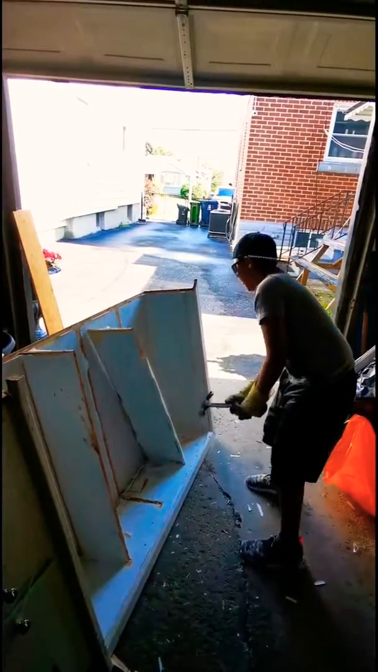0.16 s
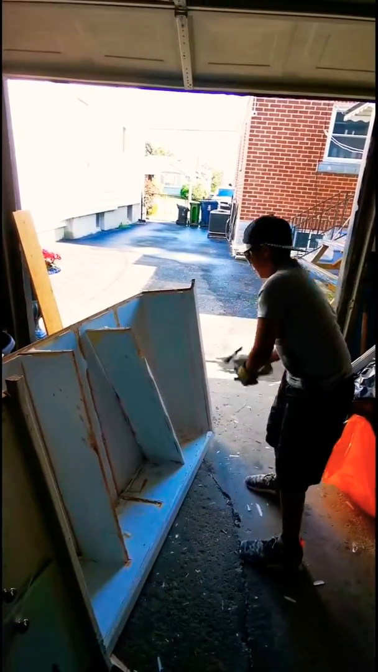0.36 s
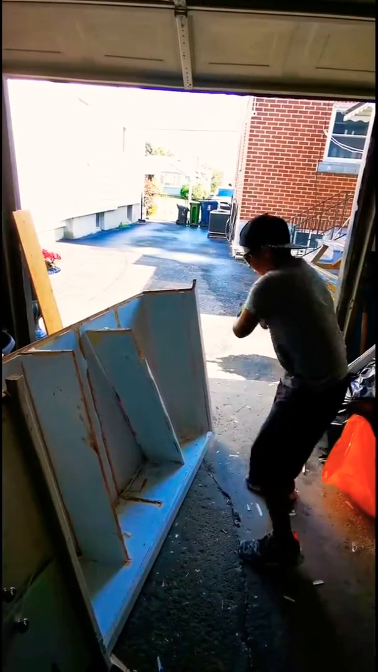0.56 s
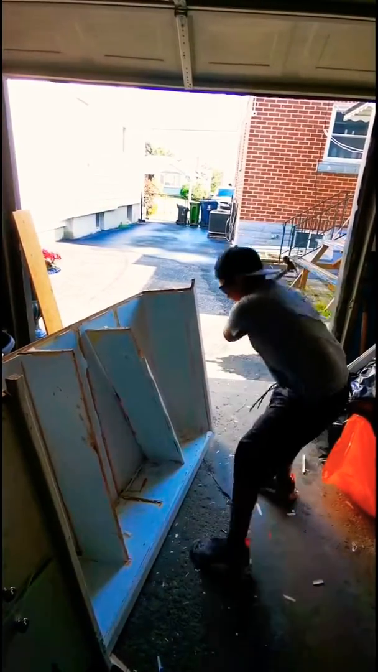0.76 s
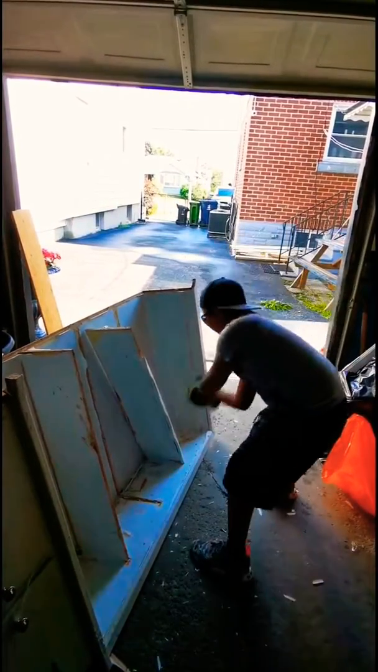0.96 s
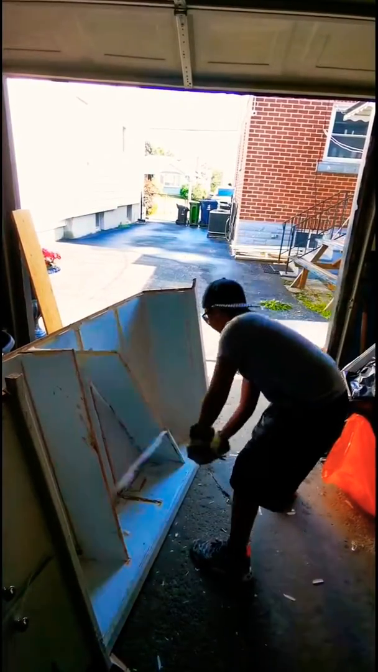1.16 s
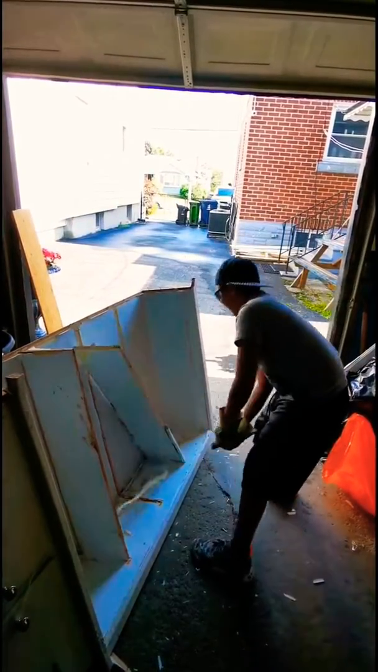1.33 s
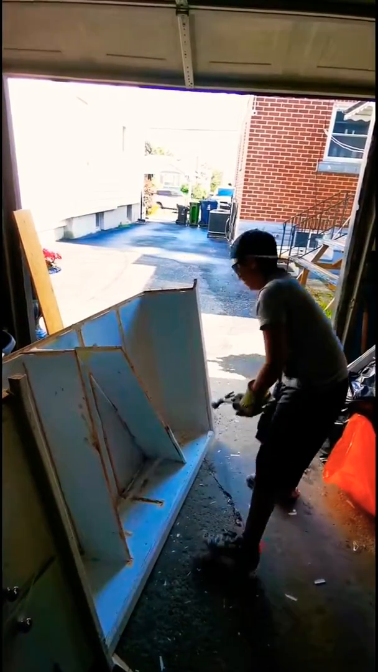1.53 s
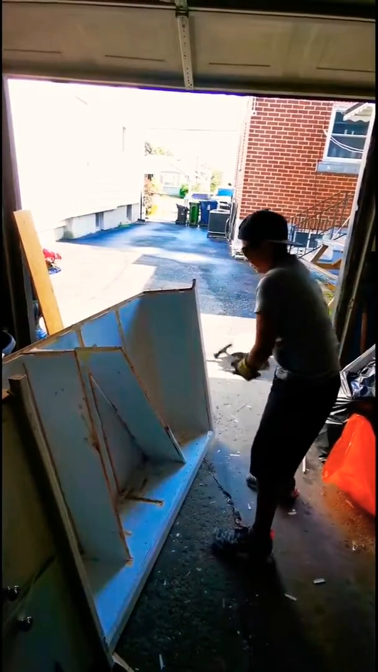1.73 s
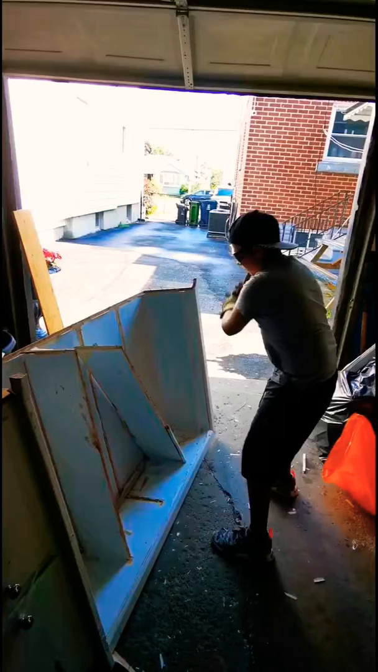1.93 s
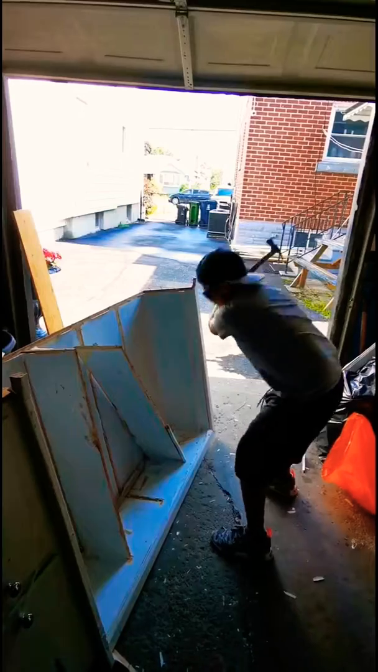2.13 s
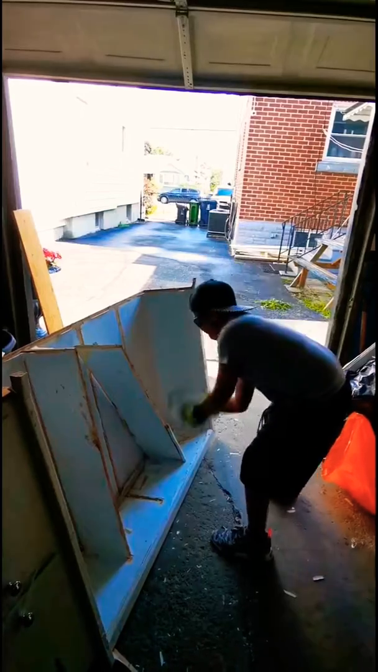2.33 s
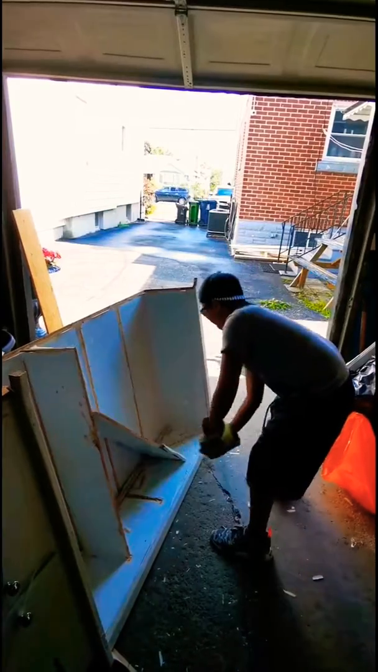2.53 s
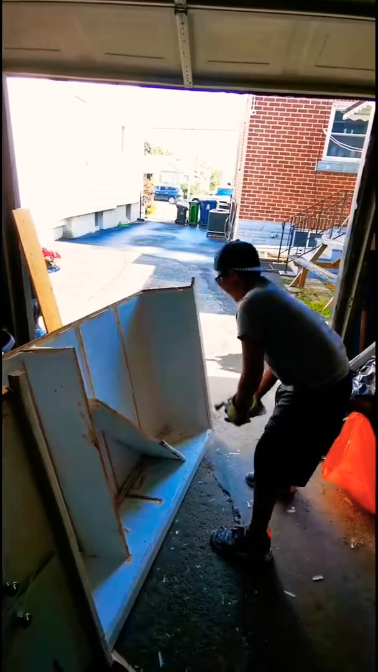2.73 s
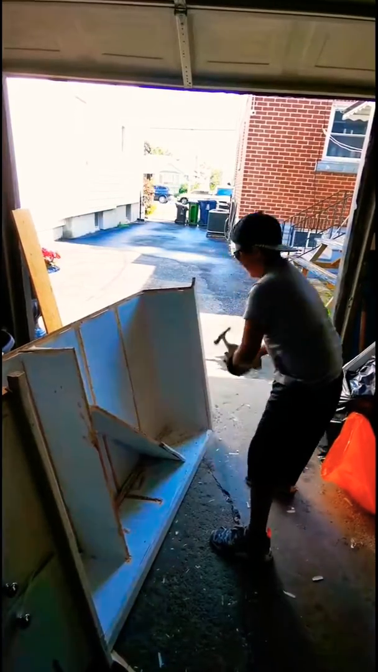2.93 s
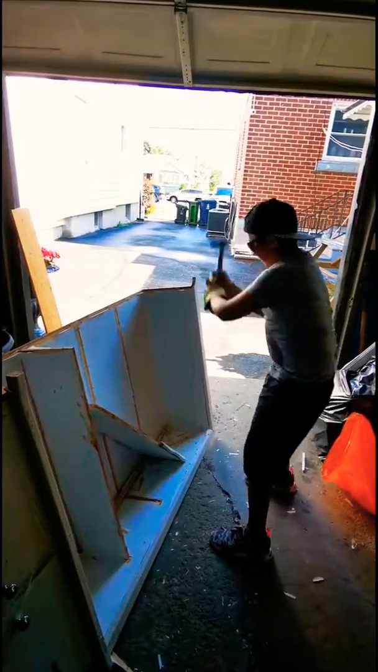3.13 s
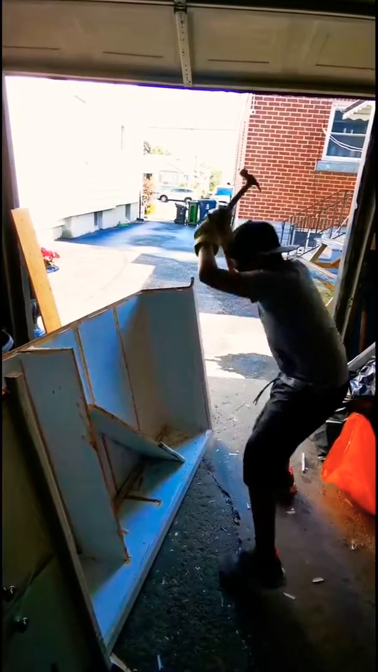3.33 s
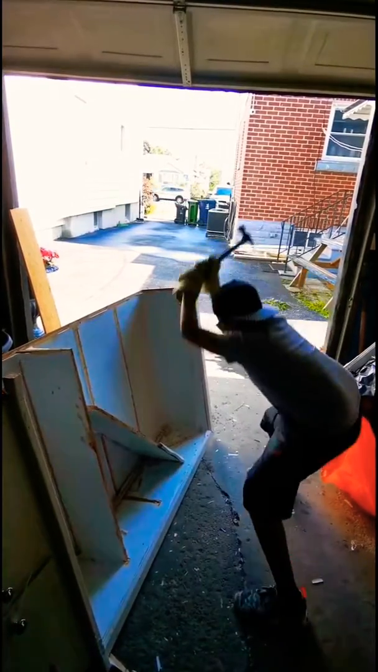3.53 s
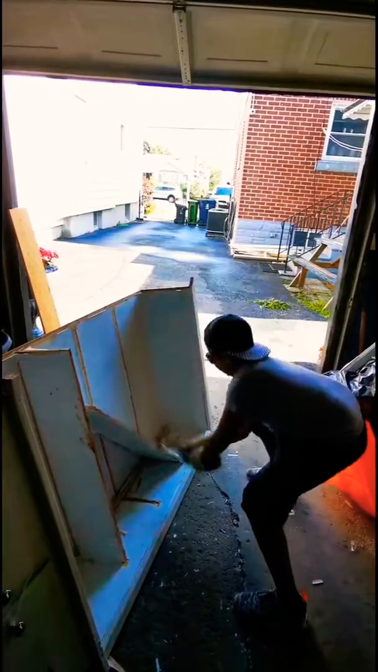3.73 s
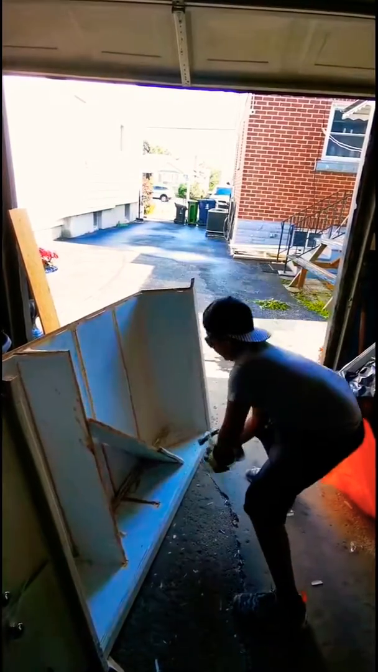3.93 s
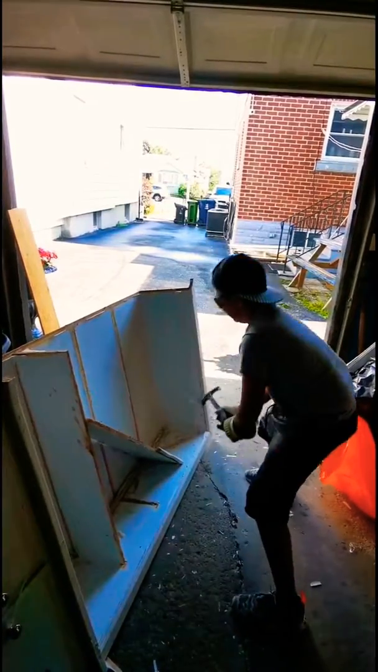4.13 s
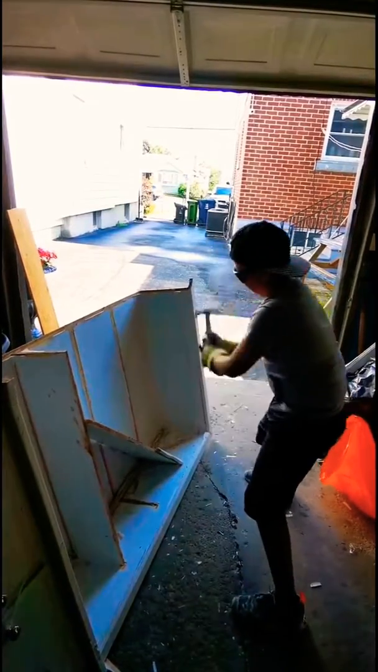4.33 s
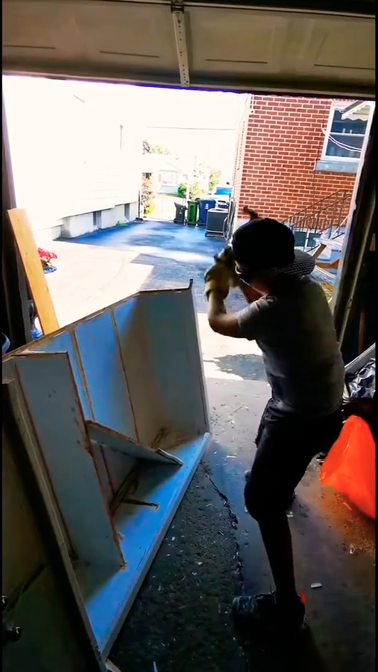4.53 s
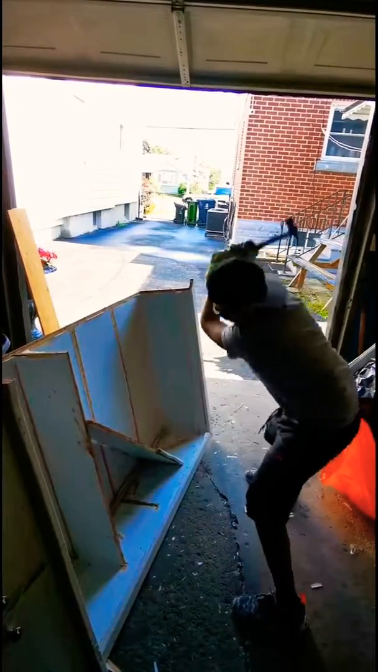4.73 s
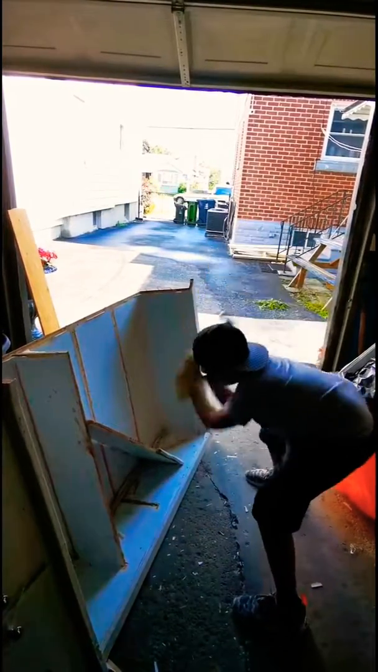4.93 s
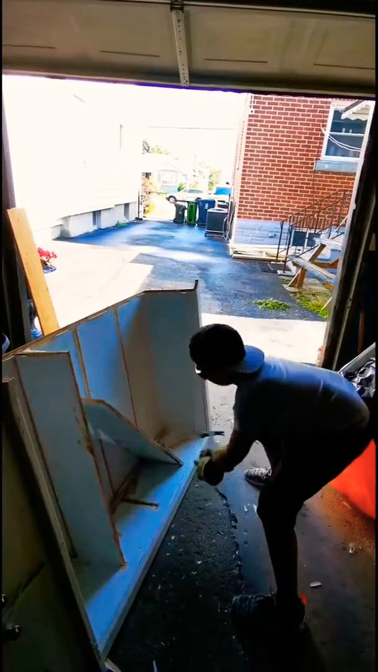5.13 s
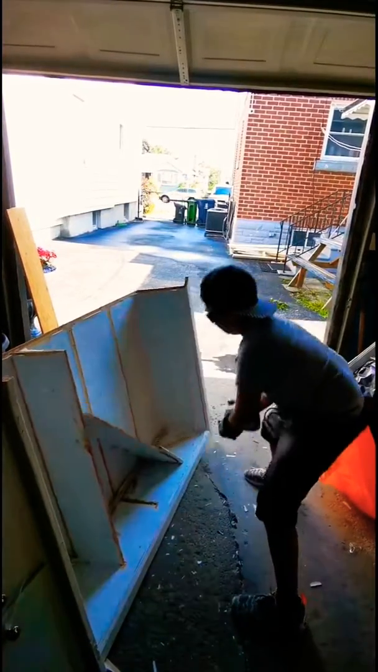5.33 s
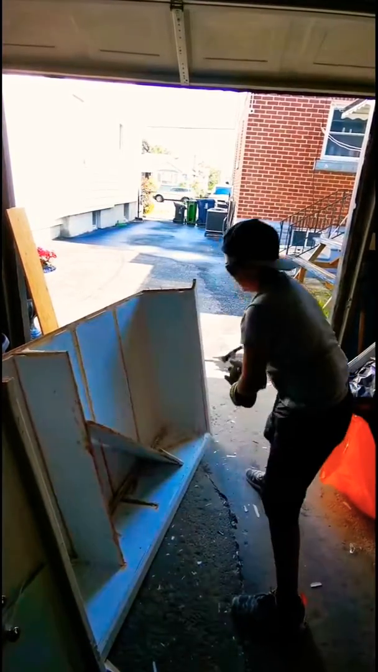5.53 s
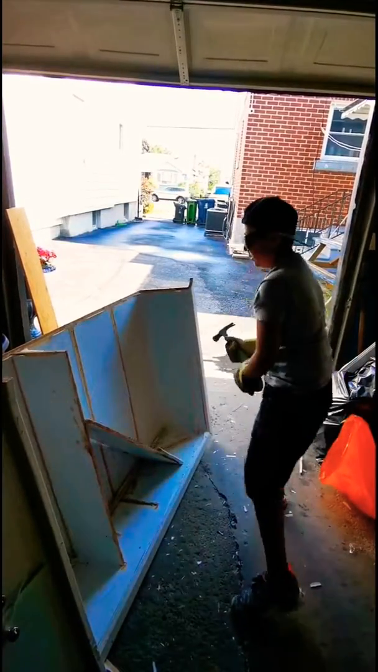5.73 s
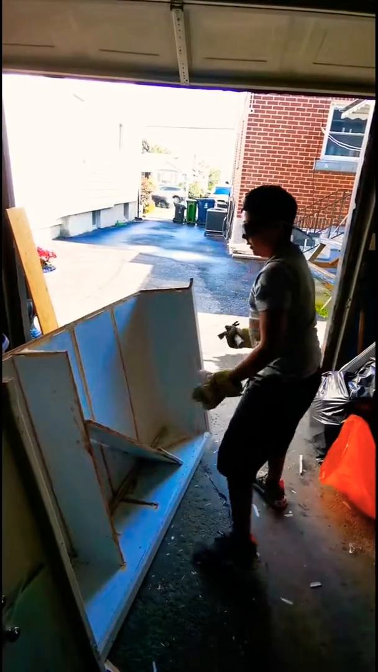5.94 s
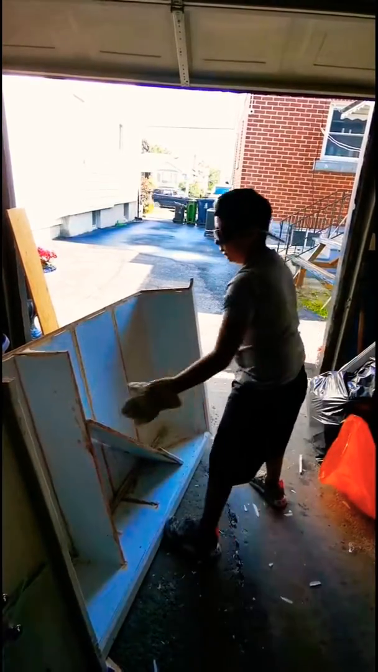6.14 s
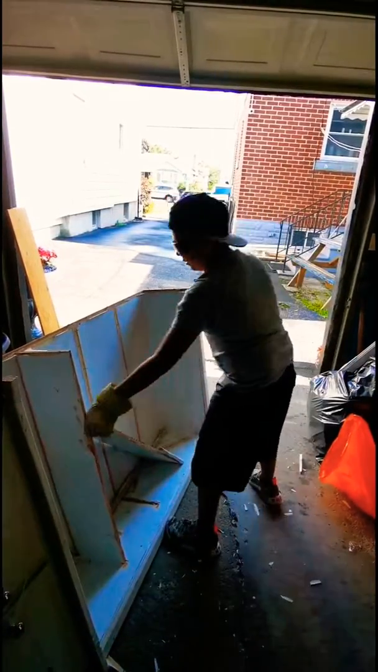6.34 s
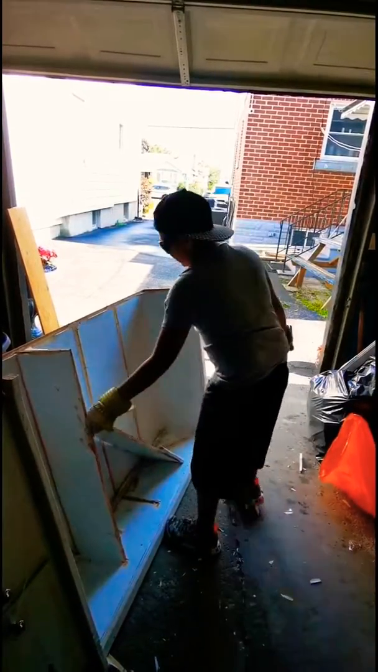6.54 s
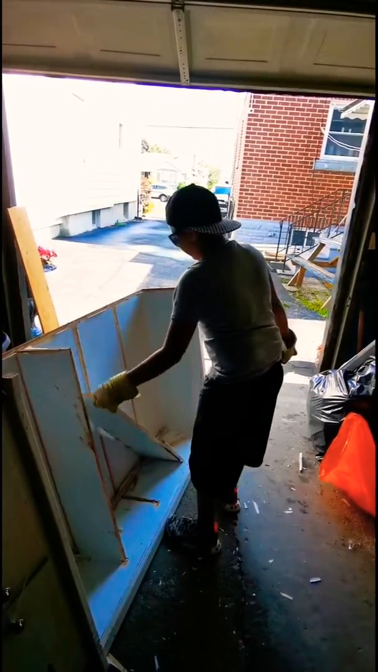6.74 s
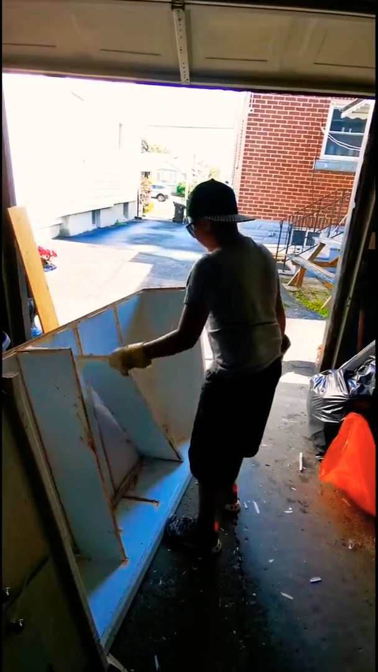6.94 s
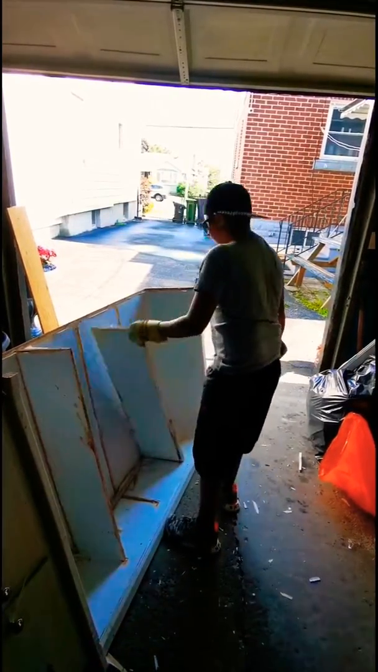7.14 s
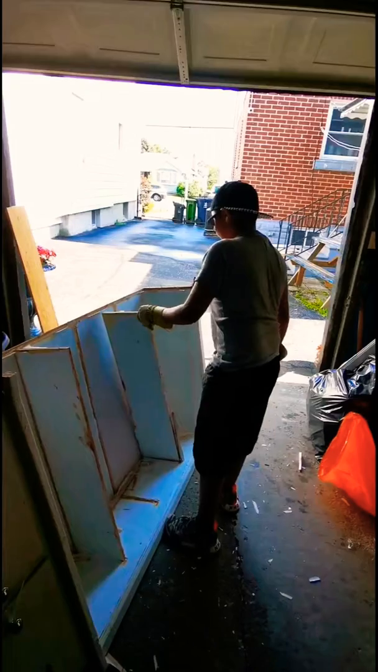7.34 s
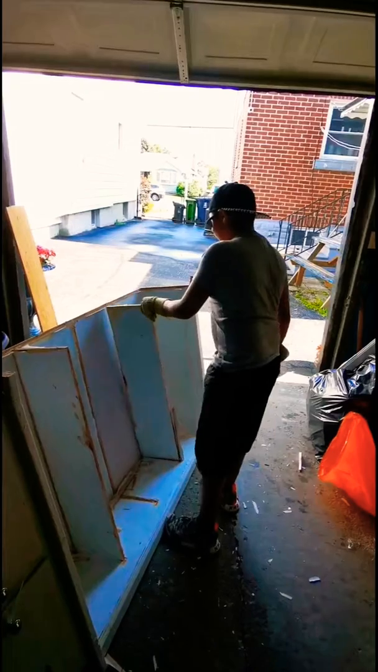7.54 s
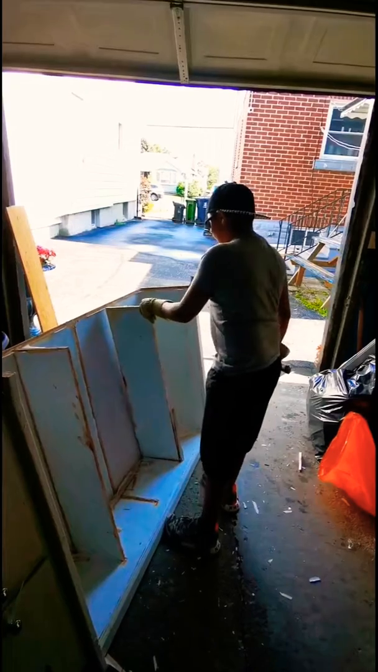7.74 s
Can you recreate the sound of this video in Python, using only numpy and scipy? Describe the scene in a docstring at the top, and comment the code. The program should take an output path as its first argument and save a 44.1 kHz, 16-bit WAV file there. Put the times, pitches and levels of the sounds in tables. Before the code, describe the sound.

A hammer lands four hard cracking blows on a hollow wooden cabinet in an echoing garage, with splinter clicks, gritty scuffs and low rumble.

```python
"""A hammer knocks a wooden shelf cabinet apart in an open garage, two metres from a two-port microphone.
Blows and falling boards crack broadly and ring panel modes; chips click on the concrete, steel clinks faintly.
Shoes and boards scuff over grit as spiky noise, and sliding boards sing as noise in narrow bands.
The garage echoes the strokes with decaying noise; behind lie a low rumble and hum from outside,
and a roar near 800 Hz that swells strongly twice."""
import sys
import numpy as np
from scipy import signal
from scipy.fft import rfft, irfft
from scipy.io import wavfile
from scipy.ndimage import uniform_filter1d

SR = 44100
rng = np.random.default_rng(int(sys.argv[2]) if len(sys.argv) > 2 else 0)


def store_wav(level_fs):
    """Save 16-bit WAV to argv[1]."""
    pcm = np.round(np.clip(np.atleast_2d(level_fs), -1, 1) * 32767)
    wavfile.write(sys.argv[1], SR, pcm.T.astype(np.int16))


N = 347508
TAIL = 24000  # longest stroke with its echo, samples


def undb(db):
    """Gain of a level in dB."""
    return 10 ** (np.asarray(db) / 20)


def unit(x):
    """Scaled to rms 1."""
    return x / np.sqrt(np.mean(x ** 2))


def set_level(x, db):
    """Sets the rms level of the first 30 ms."""
    start = x[..., :int(.03 * SR)]
    return x * undb(db) / np.sqrt(np.mean(start ** 2))


def add(out, s, x):
    """Mixes x in from time s."""
    i = int(s * SR)
    out[..., i:i + x.shape[-1]] += x[..., :out.shape[-1] - i]


def walk(rate):
    """Random levels held 1 / rate s and slewed twice."""
    hold = int(SR / rate)
    steps = np.repeat(rng.standard_normal(N // hold + 1), hold)
    return 1.9 * uniform_filter1d(uniform_filter1d(steps, hold), hold)[:N]


def over_hz(table, size):
    """A (f/Hz, value) table read at every bin of a spectrum."""
    hz, value = np.transpose(table)
    return np.interp(np.log(np.fft.rfftfreq(size, 1 / SR) + 1), np.log(hz), value)


def band(x, lo_hz, hi_hz):
    """Band-pass."""
    return signal.sosfilt(signal.butter(2, [lo_hz, hi_hz], "bandpass", fs=SR, output="sos"), x)


def resonance(hz, width):
    """Gain of one resonance at every bin; width is in Hz between the points of half amplitude."""
    return 1 / (1 + (2 * (np.fft.rfftfreq(N, 1 / SR) - hz) / width) ** 2)


def causal(table, size=2048):
    """Short minimum-phase response with the given colour and nothing before its start."""
    cepstrum = irfft(np.log(undb(over_hz(table, size))), size)
    # fold the second half onto the first
    cepstrum[1:size // 2] *= 2
    cepstrum[size // 2 + 1:] = 0
    return irfft(np.exp(rfft(cepstrum)), size)


def coloured(x, ranges, range_db):
    """Steers the rms level of the first 30 ms towards the given dB in each range, joined smoothly."""
    size = int(.03 * SR)
    hz = np.fft.rfftfreq(size, 1 / SR)
    power = 2 * np.mean(np.abs(rfft(x[:, :size])) ** 2, axis=0) / size ** 2
    rows = []
    for (lo, hi), db in zip(ranges, range_db):
        present_db = 10 * np.log10(power[(hz >= lo) & (hz < hi)].sum())
        rows.append((np.sqrt(lo * hi), db - present_db))
    return signal.fftconvolve(x, causal(sorted(rows))[None])


# How alike diffuse sound is at the left and right port: (f/Hz, likeness [-1 to 1], below 0 taken as 0)
PORT_LIKENESS = [(60, 0.99), (130, 0.97), (290, 0.91), (640, 0.64), (1410, -0.08), (3100, 0.02),
                 (6820, -0.02), (15000, 0.0)]


def diffuse(size, colour):
    """Noise from all sides: alike on both ports in the bass, unrelated in the treble."""
    alike = np.clip(over_hz(PORT_LIKENESS, size), 0, 1)
    mid, side = rfft(rng.standard_normal((2, size))) * colour
    left_right = np.array([[1], [-1]])
    return irfft(np.sqrt(1 + alike) * mid + np.sqrt(1 - alike) * side * left_right, size)


def direct(x):
    """The straight path reaches the left port 8 samples later."""
    out = np.zeros((2, TAIL))
    add(out[0], 8 / SR, x)
    add(out[1], 0, x)
    return out


def contact(length_s, spiky_db, rise_s):
    """A burst of slips and splinter snaps that builds quickly and thins out."""
    t = np.arange(int(6 * (length_s + rise_s) * SR)) / SR
    snaps = rng.standard_normal(len(t)) * undb(spiky_db * rng.exponential(size=len(t)))
    burst = snaps * (1 - np.exp(-(t / rise_s) ** 2)) * np.exp(-t / length_s)
    return burst / np.sqrt(np.sum(burst ** 2))


def ring(modes, share, scatter_db, detune):
    """One stroke: each mode gets its own strength, sign and slight detuning; share scales the decay times."""
    hz, db, t60 = np.transpose(modes)[:, :, None]
    sign, strength, offset = rng.standard_normal((len(modes), 3)).T[:, :, None]
    t = np.arange(TAIL // 2) / SR
    gain = np.sign(sign) * undb(db + scatter_db * strength - 60 * t / (share * t60))
    return np.sum(gain * np.sin(2 * np.pi * hz * (1 + detune * offset) * t), axis=0)


# Reverberation of the open garage, before each source scales it: (f/Hz, t60/s)
GARAGE_DECAY = [(60, 0.67), (160, 0.67), (420, 0.48), (1100, 0.43), (2900, 0.43), (7700, 0.5), (15000, 0.3)]
GARAGE_DB, FIRST_ECHO_S = 6.5, 0.0013  # echo energy per port; middle of the fade-in
NEAR_DB, NEAR_S = 0.5, 0.042  # the nearest walls and shelves answer first, louder and briefly


def garage(share):
    """Echoes of one stroke from one spot: noise fades in after the first wall and dies by octave."""
    t = np.arange(TAIL) / SR
    noise = rfft(diffuse(TAIL, 1))
    octave = np.log2(np.fft.rfftfreq(TAIL, 1 / SR) / 60 + 1e-9).clip(0, 8)
    hz, t60 = np.transpose(GARAGE_DECAY)
    echo = 0
    for k in range(9):
        fall = undb(-60 * t / share / np.interp(k, np.log2(hz / 60), t60))
        echo = echo + fall * irfft(noise * np.clip(1 - np.abs(octave - k), 0, 1))
    echo = echo * np.clip(t / FIRST_ECHO_S - .5, 0, 1) * (1 + undb(NEAR_DB) * np.exp(-t / NEAR_S))
    return echo * undb(GARAGE_DB) / np.sqrt(np.sum(echo ** 2) / 2)


# Colour of the background: (f/Hz, relative level/dB per Hz)
BACKGROUND_COLOUR = [(12, -37.5), (20, -10.5), (48, -3), (67, -3.5), (81, -10.5), (198, -12.5), (270, -22),
                     (301, -8), (388, -24.5), (923, -24), (3340, -36), (3630, -43.5), (4300, -37.5),
                     (10800, -47.5), (16000, -48)]
# Level changes of the background: (t/s, gain of the rumble/dB, gain of the roar near 800 Hz/dB)
BACKGROUND_LEVELS = [(0, 12.5, 6), (.4, -2, 0.5), (1.2, -0.5, 0), (1.7, 4, 23), (2.3, 0, 3),
                     (5.6, -1, -0.5), (6.4, 4, 20), (7.1, 2, 2), (7.88, 2, 7)]
# Low hum lines: (f/Hz, width/Hz, level/dB)
HUM_LINES = [(52.7, 6, -67.5), (123.4, 2, -63), (257, 4, -71), (280, 2.3, -75.5), (742, 6, -76.5),
             (890, 6, -73.5)]


def background():
    """A low rumble changes level, a roar near 800 Hz swells strongly twice, a few hum lines waver."""
    t = np.arange(N) / SR
    s, rumble_db, roar_db = np.transpose(BACKGROUND_LEVELS)
    rumble = undb(np.interp(t, s, rumble_db) + 0.47 * walk(4.4))
    roar = undb(np.interp(t, s, roar_db) + 0.47 * walk(4.4))
    bed = unit(diffuse(N, undb(over_hz(BACKGROUND_COLOUR, N)))) * undb(-53.5)
    low = irfft(rfft(bed) * resonance(0, 910.0), N)
    mid = irfft(rfft(bed) * resonance(800., 130.0), N)
    # noise in a narrow band wavers by itself
    hum = sum(undb(db) * unit(diffuse(N, resonance(hz, width))) for hz, width, db in HUM_LINES)
    # the bed already holds each band once
    return bed + (rumble - 1) * low + (roar - 1) * mid + hum


# Scuffs of soles and boards on the floor: (start t/s, swell/s, hold/s, hiss level/dB, dull part re hiss/dB)
SCUFF_STROKES = [(0.0, 0.007, .001, -56, -1.5), (0.179, .008, 0.031, -60.5, 2), (.57, 0.023, .001, -55, 3),
                 (0.644, 0.035, .02, -68, -10), (0.834, 0.018, 0.022, -61, 9.5),
                 (1.302, 0.044, .001, -44, -5), (1.516, .012, .001, -41.5, -3), (1.5, 0.21, .06, -42, -7.5),
                 (2.083, 0.054, 0.046, -48.5, -7.5), (2.145, 0.1, 0.0094, -42, -20),
                 (2.61, 0.019, 0.13, -50, -16), (2.892, .008, .001, -51.5, 4.5),
                 (3.115, .012, .001, -48, -21), (3.256, .015, 0.049, -51.5, -22),
                 (3.35, .05, 0.027, -41.5, -22), (3.476, .09, .001, -51.5, 4),
                 (3.652, 0.056, 0.022, -63.5, -11), (4.155, 0.084, 0.027, -44.5, -10),
                 (4.85, .22, 0.055, -64, -5.5), (5.383, .01, .001, -60.5, -15),
                 (5.625, .01, 0.13, -52.5, -9), (5.844, 0.21, .02, -45.5, -11),
                 (6.12, .03, 0.059, -53.5, -3), (6.29, 0.18, .05, -60, 2), (6.502, 0.011, 0.087, -46, -18),
                 (6.572, 0.039, .001, -42, -17), (6.653, 0.085, 0.0099, -49, -0.5),
                 (6.814, .05, 0.089, -62.5, 4.5), (6.978, 0.0087, 0.055, -52, -1),
                 (7.087, 0.12, 0.011, -51, -24), (7.22, 0.019, .025, -40, -19),
                 (7.344, 0.012, 0.0083, -44, -13), (7.548, .01, .001, -62.5, -6),
                 (7.654, 0.0086, 0.015, -50, -6.5), (7.727, 0.014, .001, -39.5, -16),
                 (7.755, 0.025, .08, -54.5, -9)]
# Colour of crushed grit before its band-pass: (f/Hz, relative level/dB per Hz)
GRIT_COLOUR = [(1470, -16), (2500, -8), (3060, -12), (3770, -5.5), (5650, -7.5), (6970, -10), (10900, -8),
               (14900, -18.5), (16000, -14)]
SCUFF_SWELL_POWER, SCUFF_T60_S = 1.08, 0.32


def scuffs():
    """Grit crushed under soles and board edges: spiky noise that swells, holds and dies in the garage."""
    t = np.arange(N) / SR
    hiss_power, dull_power = 0, 0
    for s, swell_s, hold_s, db, dull_db in SCUFF_STROKES:
        swell = np.clip((t - s) / swell_s, 0, 1) ** SCUFF_SWELL_POWER
        dying_s = np.maximum(t - s - swell_s - hold_s, 0)
        power = (swell * undb(db - 60 * dying_s / SCUFF_T60_S)) ** 2
        hiss_power = hiss_power + power
        dull_power = dull_power + power * undb(2 * dull_db)  # doubled: power, not amplitude
    grains = unit(undb(1.3 * walk(90) + 1.4 * rng.exponential(size=N)))
    hiss = band(grains * diffuse(N, undb(over_hz(GRIT_COLOUR, N))), 2100, .45 * SR)
    dull = band(band(grains * diffuse(N, 1), 900, 2800), 700, 3000)
    return np.sqrt(hiss_power) * unit(hiss) + np.sqrt(dull_power) * unit(dull)


# Chips and grit landing on concrete: (t/s, nominal bright peak level/dB, nominal dull peak level/dB, ring f/Hz)
CHIP_TICKS = [(0.1, -48, -59, 10800), (0.1376, -49, -53, 10300), (0.17, -51, -53, 9290),
              (0.194, -46, -59, 10200), (0.258, -59, -67, 9330), (1.321, -34, -55, 11000),
              (1.5288, -28.5, -37, 11100), (1.8895, -31.5, -38.5, 9400), (1.9866, -33.5, -42, 9200),
              (2.1288, -36, -51, 13000), (2.6015, -33, -37, 10900), (2.6754, -30.5, -37, 9510),
              (2.714, -25, -51, 9400), (2.8087, -39, -36.5, 10400), (2.902, -34, -59, 9800),
              (3.1226, -37, -48, 7600), (3.268, -58.5, -54, 7280), (5.389, -37.5, -70, 12900),
              (5.6216, -27, -36.5, 13000), (5.6957, -38, -46, 8000), (5.7825, -29, -47, 12600),
              (5.8495, -30, -46, 8100), (6.959, -64, -40, 7950), (6.9883, -35.5, -38, 10400),
              (7.352, -24.5, -35, 9100), (7.383, -30, -40.5, 9500), (7.4817, -43, -57.5, 10500),
              (7.7412, -26, -36, 8000)]


def ticks():
    """Hard chips land with a very short click, stronger around its ring frequency, and a quieter echo."""
    out = np.zeros((2, N))
    ranges = [(5970, 16000), (1660, 7300), (62.3, 590)]  # Hz: bright, dull, bass
    for s, bright_db, dull_db, hz in CHIP_TICKS:
        click = contact(.0012, spiky_db=2., rise_s=.0004)
        sound = direct(click) + undb(-8) * garage(.8)
        sound = sound + undb(4.0) * band(sound, 0.78 * hz, 1.15 * hz)
        # the click is far shorter than 30 ms, so its rms lies well under its peak; it has little bass
        range_db = [bright_db - 18.5, dull_db - 11.5, dull_db - 33.0]
        add(out, s, coloured(sound, ranges, range_db))
    return out


# Faint steel clinks: (t/s, level/dB rms over the first 30 ms, contact/s)
STEEL_CLINKS = [(.392, -66, 0.002), (.425, -76, 0.0035), (4.725, -61.5, .01), (4.79, -76, .01),
                (4.87, -78.5, .01)]
# Modes of the hammer, decay before scaling: (f/Hz, relative level/dB, t60/s)
HAMMER_MODES = [(3725, 0, .22), (3790, -3, .2), (6650, -8, .2)]
# A fitting rings as the shelf is lifted: (t/s, level/dB rms over the first 30 ms, contact/s)
FITTING_SCRAPES = [(7.232, -66, 0.038), (7.657, -45, 0.013), (7.735, -58, 0.07)]
# Modes of the fitting, decay before scaling: (f/Hz, relative level/dB, t60/s)
FITTING_MODES = [(2170, -4, 0.048), (2440, -5, 0.086), (3460, -15, .08), (4390, 4.5, 0.032),
                 (8060, -3.5, 0.063), (9500, -13, .05), (10600, -15, 0.051), (11470, -16, 0.053)]


def steel():
    """Small metal parts: bursts of contact ring a few thin modes, heard directly and through the garage."""
    out, room = np.zeros((2, N)), garage(0.84)
    for strokes, modes in ((STEEL_CLINKS, HAMMER_MODES), (FITTING_SCRAPES, FITTING_MODES)):
        for s, db, length_s in strokes:
            touch = contact(length_s, spiky_db=2., rise_s=.004)
            metal = signal.fftconvolve(touch, ring(modes, .8, scatter_db=1.5, detune=.002))
            echo = signal.fftconvolve(room, metal[None])[:, :TAIL]
            add(out, s, set_level(direct(metal) + echo, db))
    return out


# Blows and falling boards, target rms over the first 30 ms: (t/s, deep level/dB, thud level/dB,
# body level/dB, slap level/dB, splinter level/dB, note of the struck board f/Hz)
BOARD_KNOCKS = [(0.561, -69, -51, -41, -60, -54.5, 667), (0.847, -54, -65, -65, -57, -65, 291),
                (1.131, -29.5, -19.5, -17.5, -18, -22.5, 247), (1.364, -45, -32.5, -21.5, -45, -49, 973),
                (1.432, -44.5, -25.5, -35.5, -32.5, -37, 520),
                (1.747, -62.5, -26.5, -25, -22.5, -34.5, 258.4),
                (2.462, -34.5, -15, -18, -17.5, -23.5, 248), (2.611, -37, -29, -31.5, -30, -50.5, 241),
                (2.738, -55, -49.5, -68, -79, -52, 290), (2.919, -56, -59, -55, -41, -53, 777),
                (3.85, -30.5, -14.5, -14, -16, -23.5, 374), (4.045, -37.5, -31.5, -35, -37.5, -43.5, 221),
                (4.088, -36.5, -38.5, -40, -62, -53, 226), (5.142, -33, -14.5, -18.5, -13, -23, 432),
                (5.466, -36, -27, -26, -32, -38, 190), (5.589, -35.5, -28, -53, -72, -75, 412),
                (5.724, -60, -55, -49, -42, -41, 385), (6.152, -40, -38.5, -52.5, -54.5, -76, 160),
                (6.211, -43.5, -58, -50, -39.5, -74, 225), (6.298, -47, -39, -59, -77, -72, 196),
                (7.093, -53, -42.5, -42.5, -42, -62, 435), (7.553, -42.5, -46, -55, -60, -56.5, 158)]
# Modes of the cabinet panels, decay before scaling: (f/Hz, relative level/dB, t60/s)
PANEL_MODES = [(93, -19.5, 0.31), (163.4, -7.5, 0.12), (223, -3.5, 0.052), (248.4, 3.5, 0.083),
               (307, 4, 0.072), (362.7, -2, 0.13), (437, 6, 0.089), (502, -2.5, 0.14), (598, 0, 0.058),
               (662, -7, 0.17), (815, -5.5, 0.094), (946, -12, 0.18), (1050, -22, 0.013), (1276, -6, 0.031),
               (1455, -9.5, .06), (1893, -6.5, 0.063), (2070, -11, 0.077), (2110, -16.5, 0.046),
               (2354, -13.5, 0.068), (2440, -19, 0.045), (3010, -17, .04)]
# Colour of cracking wood: (f/Hz, relative level/dB per Hz)
CRACK_COLOUR = [(35, -65.5), (60, -27.5), (244, -9.5), (315, -2), (427, 6), (553, -13), (698, -1.5),
                (1510, -11.5), (2190, -8.5), (3340, -23), (10800, -43.5), (14900, -48.5), (16000, -57.5)]
# Low half and high half of the thud, body, slap, splinters, deep end, top: (from f/Hz, to f/Hz)
KNOCK_RANGES = [(150, 330), (330, 600), (600, 1500), (1500, 3300), (3300, 7000), (60, 150), (7000, 15000)]
NOTE_DB, NOTE_T60_S = 3., 0.11  # of the struck board, scaled with the panel modes
SNAP_DB = -3.5  # top re splinters
LEAN_DB, EVEN_HZ = 6, 330  # lean of the thud to its low half, per octave that the note lies under EVEN_HZ


def knocks():
    """Splinters rattle straight at the microphone; the blow cracks, rings the panels and fills the garage."""
    out, crack = np.zeros((2, N)), causal(CRACK_COLOUR)
    for s, deep_db, thud_db, body_db, slap_db, splinter_db, note_hz in BOARD_KNOCKS:
        # the board that is struck adds its own note to the modes of the cabinet
        modes = PANEL_MODES + [(note_hz, NOTE_DB, NOTE_T60_S)]
        panels = undb(-46.0) * ring(modes, 0.94, scatter_db=2.5, detune=0.0082)
        rattle = signal.fftconvolve(contact(.0044, spiky_db=5.5, rise_s=0.0024), crack)
        blow = panels + np.pad(crack, (0, len(panels) - len(crack)))
        echo = signal.fftconvolve(garage(1), blow[None])[:, :TAIL]
        sound = direct(panels) + undb(7.0) * direct(rattle) + echo
        lean_db = LEAN_DB * np.clip(np.log2(EVEN_HZ / note_hz), -.6, 1)
        low = 1 / (1 + undb(-lean_db) ** 2)  # share of the thud's power
        low_db, high_db = thud_db + 10 * np.log10([low, 1 - low])
        range_db = [low_db, high_db, body_db, slap_db, splinter_db, deep_db, splinter_db + SNAP_DB]
        add(out, s, coloured(sound, KNOCK_RANGES, range_db))
    return out


# Low thumps of air on the microphone, before the high-pass: (t/s, peak level at the left port/dB, length/s)
AIR_THUMPS = [(1.132, -11.5, 0.021), (2.462, -16.5, 0.02), (3.855, -42, 0.0063), (5.15, -36, 0.033)]


def thumps():
    """A slow push of air from some blows: one smooth hump, 12 dB weaker at the right port."""
    out = np.zeros((2, N))
    for s, db, length_s in AIR_THUMPS:
        add(out, s, undb(db) * np.hanning(int(length_s * SR)) * undb([[0], [-12.]]))
    return signal.sosfilt(signal.butter(1, 18., "highpass", fs=SR, output="sos"), out)


# Loose boards sliding, faint and narrow: (from t/s, to t/s, f/Hz, width/Hz, level before the swell/dB)
BOARD_RUBS = [(1.444, 1.72, 2300, 400, -53.5), (2.703, 3.3, 2120, 680, -62.5),
              (3.138, 3.498, 2400, 500, -64), (4.1, 4.453, 2120, 600, -64.5), (5.92, 6.13, 1516, 50, -59),
              (5.935, 6.12, 2340, 70, -62.5), (6.502, 6.822, 2450, 120, -60),
              (6.712, 6.823, 2020, 204, -61)]


def rubs():
    """Stick and slip, as noise, feeds one resonance of the board; it swells, falters and fades."""
    out, t = 0, np.arange(N) / SR
    for start, end, hz, width, db in BOARD_RUBS:
        swell = np.sin(np.pi * np.clip((t - start) / (end - start), 0, 1)) ** .5
        out = out + swell * undb(db + 1.6 * walk(25)) * unit(diffuse(N, resonance(hz, width)))
    return out


def scene():
    """Everything that reaches the two ports."""
    return background() + scuffs() + ticks() + steel() + knocks() + thumps() + rubs()


# Difference in colour between the microphone ports: (f/Hz, left minus right level/dB)
PORT_COLOUR = [(60, 0.0), (110, 0.0), (200, -0.5), (380, -3.5), (700, -4.5), (1290, -5.5), (2380, -9.0),
               (4400, -2.5), (8120, -4.0), (15000, -10.0)]


def record(dry):
    """The right port is brighter, with a peak of its own; the loudest peaks are rounded and the top is cut."""
    ports = []
    for x, share in zip(dry, (.25, -.75)):  # left, right share of the difference
        colour = causal([(hz, share * db) for hz, db in PORT_COLOUR])
        ports.append(signal.fftconvolve(x, colour)[:N])
    ports = np.array(ports)
    rounded = ports / (1 + np.abs(ports) ** 8) ** (1 / 8)
    top_cut = signal.ellip(10, .2, 70, 15800, fs=SR, output="sos")  # from 15800 Hz
    return signal.sosfilt(top_cut, rounded)


dry = scene()
out = record(dry)
store_wav(out)
```